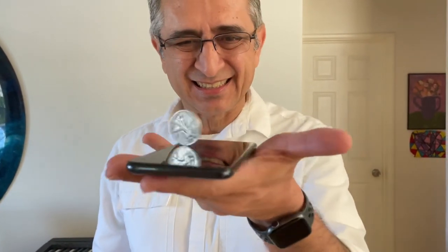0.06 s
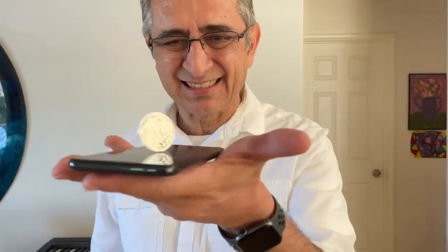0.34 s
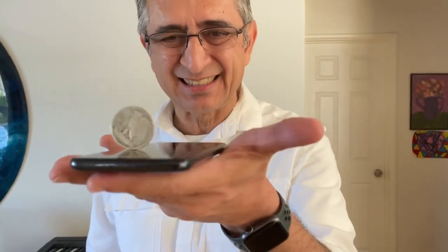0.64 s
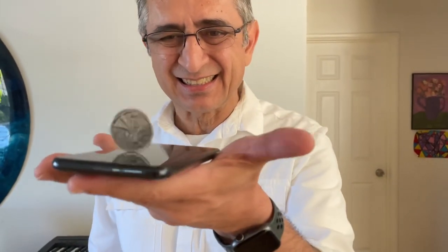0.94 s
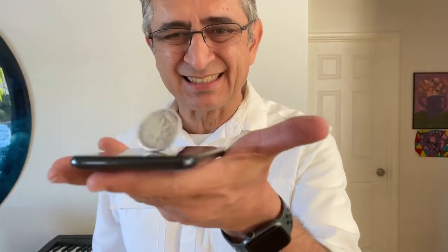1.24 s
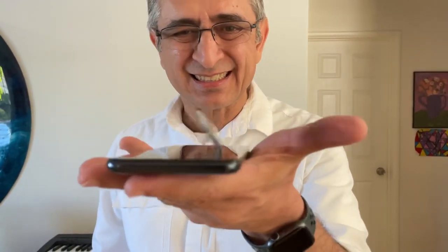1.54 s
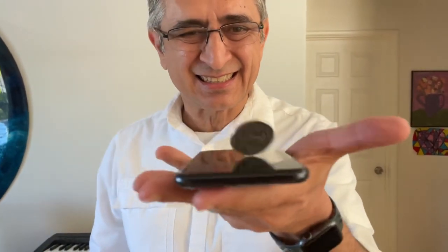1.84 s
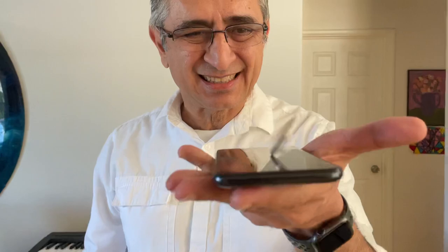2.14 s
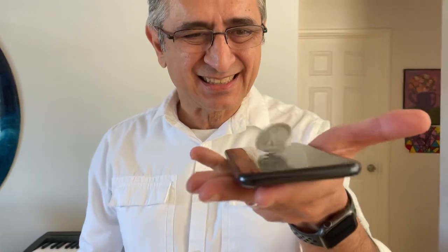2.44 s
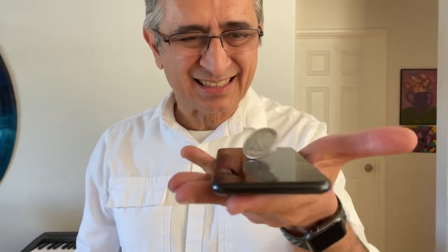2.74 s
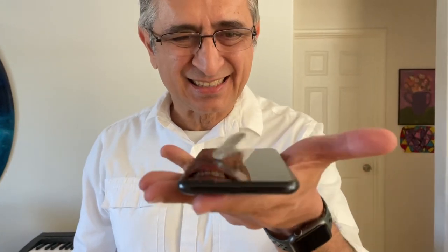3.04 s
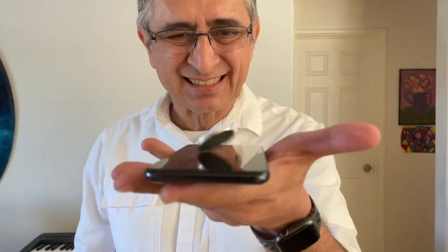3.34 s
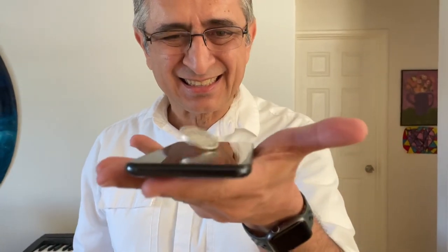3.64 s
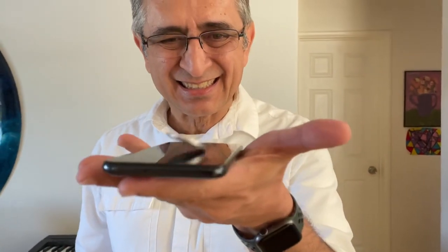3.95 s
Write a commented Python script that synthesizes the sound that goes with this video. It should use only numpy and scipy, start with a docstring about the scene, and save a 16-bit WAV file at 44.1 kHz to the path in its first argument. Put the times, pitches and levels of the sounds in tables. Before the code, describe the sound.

A spinning coin ticks on glass, then leans into a quickening, louder chatter.

```python
"""In a quiet room, close to a two-port microphone, a large coin spins on the glass of a phone held on
an open palm. Upright, it only ticks and sings faintly; as it leans over, its rim rolls in a dense
chatter of tiny impacts, ever faster and louder, that swells with each turn. The impacts excite the
damped modes of the glass, the phone's body and the coin. The sound reaches the ports directly, by
scattering from hand, face and shirt, and as reverberation, over low room noise and a hum."""
import sys
import numpy as np
from scipy import signal
from scipy.fft import rfft, irfft, next_fast_len
from scipy.io import wavfile
from scipy.ndimage import uniform_filter1d

SR = 44100
rng = np.random.default_rng(int(sys.argv[2]) if len(sys.argv) > 2 else 0)


def master_out(mix):
    """Clip the mix to full scale and print it as 16-bit PCM to the path in sys.argv[1]."""
    frames = np.transpose(np.atleast_2d(mix))
    ceiling = np.clip(frames, -1, 1)
    pcm = np.round(ceiling * 32767).astype(np.int16)
    wavfile.write(sys.argv[1], SR, pcm)


N = 176400
TIME = np.arange(N) / SR

# Levels are relative; a width is the standard deviation of a Gaussian power envelope.
# Spectrum of the room noise: f/Hz, level/dB
NOISE_SPECTRUM = [(20, -53), (32, -22), (42, -0.5), (52, -2.5), (80, 2), (110, -3), (165, -3.5),
                  (220, -9.5), (400, -11), (900, -22), (2000, -37), (3300, -35.5), (4600, -51), (7000, -56),
                  (11000, -43), (13000, -78), (16000, -62)]
# Tones of the hum: f/Hz, level/dB, rms wander/Hz
HUM_TONES = [(53.9, -61.5, 0.72), (119.1, -68, 2.2), (164.2, -70.5, 5), (317.4, -72, .6)]
# Envelope of the upright coin's singing: t/s, level/dB
SING_ENVELOPE = [(0, -86), (.09, -73), (.14, -82), (.45, -76), (.8, -81.5), (1.25, -81), (1.6, -88)]
# Steady rolling: t/s, glass level/dB, body re glass/dB, treble re glass/dB
ROLL_ENVELOPE = [(0.0, -71, -1, -7), (0.5, -69, 7, -6), (0.85, -76, 2.5, 9), (1.03, -72.5, 10, -6),
                 (1.35, -61, 4, -1), (1.75, -53, -1.5, 2.5), (2.3, -53, -4, 1), (2.7, -45, -12, -5),
                 (3.25, -45.5, -7, 1.5), (3.6, -43.5, -8, 2), (4.0, -43, -10.5, 0.6)]
# Swells of rim contact: t/s, width/s, glass level/dB, body re glass/dB, treble re glass/dB
RIM_SWELLS = [(0.19, 0.008, -60, -14, -9), (0.245, 0.0099, -62.5, -14, -7), (0.364, 0.0066, -55.5, 0, -12),
              (0.42, 0.0074, -71, -1, -4), (0.49, 0.0051, -68, -4, -28), (0.99, 0.0084, -64.5, 6.5, -6),
              (1.053, 0.0046, -63.5, 7, -22), (1.125, 0.016, -51.5, 0.5, -23),
              (1.258, 0.016, -50.5, 2, -26), (1.294, 0.02, -52, 3.5, -15), (1.404, 0.013, -49, -3, -23),
              (1.43, 0.0086, -47.5, 0.5, -0.5), (1.545, 0.011, -48, -2.5, -3),
              (1.666, 0.0079, -50.5, -5, 6), (1.715, 0.03, -61.5, 8, -7), (1.838, 0.0068, -49, 3, -3),
              (1.867, 0.0055, -51.5, 0.5, 7.5), (1.968, 0.014, -45.5, -8, -3),
              (2.077, 0.0064, -46.5, -7, -16), (2.098, 0.0096, -46.5, -11, 2),
              (2.207, 0.0084, -47, -13, 2.5), (2.247, 0.0086, -53.5, 3, 4), (2.324, 0.014, -53.5, -12, 2),
              (2.377, 0.023, -51.5, 0.5, 3.5), (2.491, 0.015, -43, -11.5, -1.5),
              (2.608, 0.013, -46, -11, 1.5), (2.72, 0.016, -47, -12, 1.5), (2.82, 0.0054, -59, -8, -1.0),
              (2.861, 0.024, -53.5, -2, 6), (2.982, 0.028, -52, -3, 5), (3.083, 0.027, -49, -11, 1.5),
              (3.192, 0.021, -45.5, -15.5, 0), (3.298, 0.012, -43, -22, 0.5), (3.398, 0.012, -44, -16, -5),
              (3.509, 0.071, -48.5, -10, 0), (3.635, 0.0081, -43, -26, 4), (3.727, 0.012, -39.5, -20, -2),
              (3.812, 0.01, -40, -14, -1.5), (3.878, 0.047, -49.5, -20, 3.5), (3.952, 0.0047, -41, -33, -6),
              (3.995, 0.0042, -44, -2, -10.0)]
# Single knocks of the rim: t/s, glass level/dB, treble re glass/dB
RIM_KNOCKS = [(0.351, -23, -10.5), (0.375, -25.5, -11.5), (.481, -31, -10.5), (.554, -32, -19),
              (0.626, -32, -3), (0.677, -34.5, -9), (.925, -35.5, -6), (0.97, -34.5, -6.5),
              (1.04, -37, -16), (1.103, -27.5, -11), (1.115, -22.5, -9.5), (1.181, -24, -17),
              (1.226, -25, -14), (1.236, -25.5, -9), (1.246, -17.5, -11), (1.268, -26, -20),
              (1.29, -24.5, -10), (1.296, -19, -6), (1.367, -32, -19), (1.389, -19, -17),
              (1.397, -20.5, -15), (1.401, -25, -10), (1.413, -18, -7), (1.51, -32, -18), (1.553, -26, 8.5),
              (1.649, -27.5, 9.5), (1.829, -23, -7), (1.959, -22.5, -5), (3.952, -24.5, -4),
              (3.957, -23, 10)]
# Spectrum of one impact: f/Hz, level/dB
IMPACT_SPECTRUM = [(100, -28), (300, -18), (450, -10.5), (680, 3), (880, -6.5), (1150, -3), (1500, -3),
                   (1900, 2), (2600, 3), (3100, -3.5), (3500, -11), (4200, -18), (4900, -18.5), (5300, -11),
                   (6200, -3), (7500, -4.5), (8400, -7), (9400, -10.5), (11000, -18.5), (11600, -16),
                   (12700, -12.5), (13800, -24), (14700, -12), (15700, -17)]
# Modes of the glass and phone: f/Hz, level/dB, T60/s
PLATE_MODES = [(720, -12, .03), (1120, -12, .04), (1251, -15, .05), (1476, -16, .06), (1815, -16, .06),
               (1887, -14, .06), (2045, -17, .05), (2444, -16, .06), (2584, -16, .06), (2944, -23, .05),
               (3103, -23, .05)]
# Coin mode that rings on while it stands upright: f/Hz, level/dB, T60/s
UPRIGHT_MODES = [(8820, -11, 0.27)]
# Lower short-lived coin modes: f/Hz, level/dB, T60/s
LOW_COIN_MODES = [(6040, -38, .05), (8930, -7, 0.037)]
# Highest coin mode: f/Hz, level/dB, T60/s
HIGH_COIN_MODES = [(11470, -14, 0.022)]
# Radiation of the upright coin relative to the leaning coin: f/Hz, gain/dB
UPRIGHT_RESPONSE = [(700, -4.5), (1150, -0.5), (2400, -1.5), (2800, -7), (3400, -11.5), (4400, 12.5),
                    (6500, -3.5), (11000, 0.5), (14000, -6)]
# Catches of the milled edge on the glass: t/s, level/dB
EDGE_TICKS = [(.3512, -44), (.627, -44), (1.1022, -41), (1.2455, -33), (1.3886, -35), (1.5507, -28),
              (1.6485, -24), (1.6714, -26), (1.7439, -25), (2.142, -31), (2.2044, -21), (2.33, -25),
              (2.6125, -26), (2.6956, -27), (2.7945, -25), (3.2864, -25), (3.9556, -20)]
# Spectrum of one tick: f/Hz, level/dB
TICK_SPECTRUM = [(1500, -16), (4000, -9), (7000, -2), (10000, -3), (13000, 0), (16000, 0)]
# Further brief resonances of the contact, at a steady hollow pitch: t/s, level/dB
HOLLOW_TONES = [(1.122, -49), (1.291, -46.5), (1.407, -42.5), (1.622, -50), (1.713, -50.5), (1.832, -41.5),
                (1.94, -51), (2.249, -57), (2.364, -53), (2.613, -48.5), (2.856, -49), (3.425, -45),
                (3.51, -44.5), (3.6, -42), (3.69, -47), (3.842, -41), (3.924, -42.5)]
# Gliding resonances of the contact: t/s, width/s, level/dB, starting f/Hz, final f/Hz
RIM_RASPS = [(1.668, 0.013, -49.5, 2920, 2380), (1.862, 0.0093, -51.5, 1700, 3100),
             (1.986, 0.014, -55, 3430, 3220), (2.1, 0.006, -45, 3060, 3430), (2.21, 0.013, -50, 3470, 2830),
             (2.375, 0.0082, -40.5, 2000, 2300), (2.483, 0.01, -51, 3100, 3650),
             (2.722, 0.013, -49.5, 1500, 1450)]
# Level difference between the ports: f/Hz, left minus right/dB
PORT_LEVEL_DIFFERENCE = [(400, -3.5), (750, -2.5), (1150, -5.5), (1500, 6.5), (2300, -0.5), (3100, -6.5),
                         (3900, -6), (4600, 9.5), (5400, 3), (6100, -17), (6900, -2), (8500, 0)]
# Phase difference between the ports: f/Hz, lead of left/rad
PORT_PHASE_LEAD = [(100, -.1), (1250, -.2), (1550, 1.2), (1750, .25), (3200, -.2), (4000, 1), (4800, 3),
                   (5750, 3.2), (6250, .95), (7100, 1.15), (8000, 2.7), (9400, 3.7), (9800, 6),
                   (11100, 6.25), (11900, 8.8), (13650, 9.5), (13950, 12.3), (15700, 13)]
# Response of the scattering from hand, face and shirt: f/Hz, gain/dB
SCATTER_RESPONSE = [(500, -5), (1000, -4), (1550, 6), (2400, -1), (4000, 5), (5300, -4), (7000, 0),
                    (8400, -7), (10500, -3), (12700, -11), (15000, -5)]
# Reverberation time of the room: f/Hz, T60/s
REVERB_TIME = [(200, 1), (2000, 0.68), (8000, 0.38), (16000, 0.16)]
# Response of the path through the room: f/Hz, gain/dB
REVERB_RESPONSE = [(300, -17.5), (1500, -3.5), (2500, -6.5), (4000, -1), (7000, -20), (15000, -61)]

BODY_HZ, TREBLE_HZ = 1380, 3330  # crossovers of the three registers: body to glass, glass to treble
FIRST_RATE, LAST_RATE = 320, 1500  # mean impacts per second in the body and glass registers
LEAN_START_S, LEAN_DURATION_S = 1.35, 0.46
LEAN = np.clip((TIME - LEAN_START_S) / LEAN_DURATION_S, 0, 1)  # 0 upright, 1 rolling on the rim


def amp(db):
    """Amplitude ratio of a level in decibels."""
    return 10 ** (np.asarray(db) / 20)


def unit(x):
    """Normalisation to rms 1."""
    return x / np.sqrt(np.mean(x ** 2) + 1e-20)


def along(points, hz):
    """Interpolation of (f/Hz, value) points on a logarithmic frequency axis."""
    f, values = np.transpose(points)
    return np.interp(np.log(hz + 1), np.log(np.sort(f) + 1), values)


def bell(centre_s, width_s):
    """Gaussian envelope of peak 1."""
    return np.exp(-.5 * ((TIME - centre_s) / width_s) ** 2)


def pan(db):
    """Constant-power left and right gains for a level difference."""
    gains = np.array([amp(db / 2), amp(-db / 2)]).reshape(2, -1)
    return gains / np.sqrt(np.mean(gains ** 2, axis=0))


def filtered(x, response):
    """Linear filtering: the spectrum is multiplied by a complex frequency response."""
    size = next_fast_len(N + SR // 2)
    return irfft(rfft(x, size) * response(np.fft.rfftfreq(size, 1 / SR)), size)[..., :N]


def coloured(x, spectrum):
    """Zero-phase filtering by a table of (f/Hz, gain/dB)."""
    return filtered(x, lambda f: amp(along(spectrum, f)))


def narrowband(hz, width_hz):
    """Noise of rms 1 confined to a narrow band, which makes an unsteady tone."""
    return unit(filtered(rng.standard_normal(N), lambda f: 1 / (1 + ((f - hz) / width_hz * 2) ** 2)))


def click(gain, size=4096):
    """Minimum-phase pulse of energy 1 and given spectral shape, from the folded cepstrum."""
    cepstrum = irfft(np.log(np.maximum(gain(np.fft.rfftfreq(size, 1 / SR)), 1e-6)))
    folded = np.r_[cepstrum[0], 2 * cepstrum[1:size // 2]]
    pulse = irfft(np.exp(rfft(folded, size)))
    return pulse / np.linalg.norm(pulse)


def ring(modes):
    """Free vibration: a sum of damped sinusoids, each with the energy of its level."""
    t = np.arange(SR // 4) / SR
    response = np.zeros(len(t))
    for hz, db, t60 in modes:
        wave = np.sin(2 * np.pi * (hz * t + rng.random())) * amp(-60 * t / t60)
        response += amp(db) * wave / np.linalg.norm(wave)
    return response


def background():
    """Low room noise, partly coherent between the ports, and a hum with random frequency modulation."""
    mid, side = unit(coloured(rng.standard_normal((2, N)), NOISE_SPECTRUM))
    side *= amp(-8.5)
    hum = np.zeros(N)
    for hz, db, wander_hz in HUM_TONES:
        cycles = rng.random() + np.cumsum(hz + wander_hz * narrowband(0, width_hz=8.04)) / SR
        hum += amp(db) * np.sqrt(2) * np.sin(2 * np.pi * cycles)
    return (amp(-59) * np.array([mid + side, mid - side]) + hum) * pan(-1.5)


def singing():
    """Sustained excitation: the pivoting edge keeps one mode of the coin sounding."""
    envelope = amp(np.interp(TIME, *np.transpose(SING_ENVELOPE)))
    return envelope * narrowband(6190, width_hz=45) * pan(-9.5)


def chatter(spread_db=3.5, own_share=0.23, load_s=0.03):
    """Poisson impacts of rising rate share a steady load: mean power 1 in glass, body and treble."""
    rate = np.geomspace(FIRST_RATE, LAST_RATE, N) * np.array([[1], [1], [3]])  # denser in the treble
    hits = rng.random(N) < rate / SR
    common = np.sqrt(1 - own_share) * rng.standard_normal(N)
    own = np.sqrt(own_share) * rng.standard_normal((3, N))
    force = hits * amp(spread_db * (common + own))
    span = int(load_s * SR / 2)
    load = np.abs(uniform_filter1d(uniform_filter1d(force ** 2, span), span))
    return force / np.sqrt(load + 1e-6)


def rim_force(contact_s=0.026):
    """Rolling and swells add in power and modulate the chatter; knocks are single impulses."""
    times, level, body, treble = np.transpose(ROLL_ENVELOPE)
    roll_db = np.array([np.interp(TIME, times, level + offset) for offset in (0, body, treble)]) - 0.5
    gap = 1 - np.max([bell(swell[0], contact_s) for swell in RIM_SWELLS], axis=0)
    power = amp(roll_db + gap * np.array([[-4], [-2], [-9]])) ** 2  # the roll eases between swells
    for at, width, level, body, treble in RIM_SWELLS:
        power += amp(level + np.array([[0], [body], [treble]])) ** 2 * bell(at, width)
    force = np.sqrt(power) * chatter()
    for at, level, treble in RIM_KNOCKS:
        force[:, round(at * SR)] += amp(level + np.array([0, -1, treble]))
    return force


def strike(force, response):
    """Superposition of impulse responses, with random signs since each impact lands elsewhere."""
    return signal.fftconvolve(force * np.sign(rng.standard_normal(N)), response)[:N]


def impact_clicks(glass, body, treble):
    """Complementary crossovers divide the impact spectrum among the three registers of force."""
    def below(f, hz):
        return 1 / (1 + (f / hz) ** 12)

    def pulse(power_share):
        return click(lambda f: amp(along(IMPACT_SPECTRUM, f)) * np.sqrt(power_share(f)))

    return (strike(body, pulse(lambda f: below(f, BODY_HZ)))
            + strike(glass, pulse(lambda f: (1 - below(f, BODY_HZ)) * below(f, TREBLE_HZ)))
            + strike(treble, pulse(lambda f: 1 - below(f, TREBLE_HZ))))


def travelling_contact(x, depth_db=2, width_hz=430.6, life_s=0.026):
    """A moving point of excitation favours ever different frequencies: a smooth random gain field."""
    spectra = signal.stft(x, nperseg=256)[2]
    field = uniform_filter1d(rng.standard_normal(spectra.shape), round(width_hz * 256 / SR), axis=0)
    field = uniform_filter1d(field, round(life_s * SR / 128), axis=1)
    return signal.istft(spectra * unit(amp(depth_db * unit(field))), nperseg=256)[1][:N]


def rolling_coin():
    """Impact excitation: each contact clicks and rings the modes of the plate and of the coin."""
    glass, body, treble = rim_force()
    clicks = impact_clicks(glass, body, treble)
    plate = strike(body, ring([mode for mode in PLATE_MODES if mode[0] < BODY_HZ]))
    plate += strike(glass, ring([mode for mode in PLATE_MODES if mode[0] >= BODY_HZ]))
    metal = (1 - LEAN) * strike(glass, ring(UPRIGHT_MODES))
    metal += strike(glass, ring(LOW_COIN_MODES)) + strike(treble, ring(HIGH_COIN_MODES))
    return travelling_contact(clicks + amp(0.5) * plate) + metal


def radiation(x):
    """Radiation depends on tilt: the upright coin's colouring fades out as it leans."""
    return (1 - LEAN) * coloured(x, UPRIGHT_RESPONSE) + LEAN * x


def edge_ticks():
    """The milled edge catches the glass; so brief a force has a broad, bright spectrum."""
    force = np.zeros(N)
    for at, db in EDGE_TICKS:
        force[round(at * SR)] = amp(db)
    return signal.fftconvolve(force, click(lambda f: amp(along(TICK_SPECTRUM, f))))[:N]


def hollow_note():
    """The resonance of the contact also answers briefly at a steady, hollow pitch near 1150 Hz."""
    power = sum(amp(db) ** 2 * bell(at, width_s=0.0055) for at, db in HOLLOW_TONES)
    tone = narrowband(1150, width_hz=270)
    local_rms = np.sqrt(np.abs(uniform_filter1d(tone ** 2, size=900)) + 1e-3)
    return np.sqrt(power) * tone / local_rms


def rasps(bandwidth_hz=470):
    """Forced vibration: the chatter drives a contact resonance that glides as the coin turns."""
    force = chatter()[0] * np.sign(rng.standard_normal(N))
    lowpass = signal.butter(2, bandwidth_hz / 2, fs=SR)
    out = np.zeros(N)
    for at, width, db, from_hz, to_hz in RIM_RASPS:
        span = np.abs(TIME - at) < 5 * width
        offset = (TIME[span] - at) / width
        hz = np.interp(offset, [-2, 2], [from_hz, to_hz])
        carrier = np.exp(2j * np.pi * np.cumsum(hz) / SR)
        # Shifting down, low-passing and shifting back makes a gliding band-pass.
        tone = (signal.lfilter(*lowpass, force[span] / carrier) * carrier).real
        out[span] += amp(db) * unit(tone) * np.exp(-(offset / 2) ** 2)
    return out


def direct_path(x):
    """The direct wave differs between the ports in level and phase, according to frequency."""
    def response(f):
        half_lead = along(PORT_PHASE_LEAD, f) / 2
        return pan(along(PORT_LEVEL_DIFFERENCE, f)) * np.exp(1j * np.array([half_lead, -half_lead]))

    return filtered(x, response)


def scattering(x, t60=0.028, renew_s=0.15):
    """Early reflections from hand, face and shirt differ at each port and change as the hand moves."""
    t = np.arange(SR // 20) / SR
    step = round(renew_s * SR)
    wet = np.zeros((2, N + len(t)))
    for start in range(0, N, step):
        taps = rng.standard_normal((2, len(t))) * amp(-60 * t / t60) * (t > .001)
        taps /= np.linalg.norm(taps, axis=1, keepdims=True)
        part = signal.fftconvolve(x[None, start:start + step], taps, axes=1)
        wet[:, start:start + part.shape[1]] += part
    return amp(-11) * coloured(wet[:, :N], SCATTER_RESPONSE)


def reverberation(x):
    """A diffuse field, independent at each port, decays exponentially and fastest in the treble."""
    hz, t, spectra = signal.stft(rng.standard_normal((2, SR // 2)), SR, nperseg=256)
    t60 = along(REVERB_TIME, hz)[:, None]
    tail = signal.istft(spectra * amp(-60 * t / t60) / np.sqrt(t60), SR, nperseg=256)[1]
    delayed = np.pad(x, (SR // 300, 0))
    wet = signal.fftconvolve(delayed[None], tail / np.linalg.norm(tail[0]), axes=1)[:, :N]
    return coloured(wet, REVERB_RESPONSE)


def scene():
    """Superposition at the ports of direct, scattered and reverberant sound, singing and background."""
    source = radiation(rolling_coin()) + rasps() + hollow_note() + edge_ticks()
    at_ports = direct_path(source) + scattering(source) + reverberation(source)
    return amp(-2.0) * at_ports + singing() + background()


def record(dry):
    """Band limiting: a very steep low-pass filter removes the highest frequencies."""
    cutoff_hz = 15850
    return filtered(dry, lambda f: 1 / np.sqrt(1 + (f / cutoff_hz) ** 400))


dry = scene()
out = record(dry)
master_out(out)
```